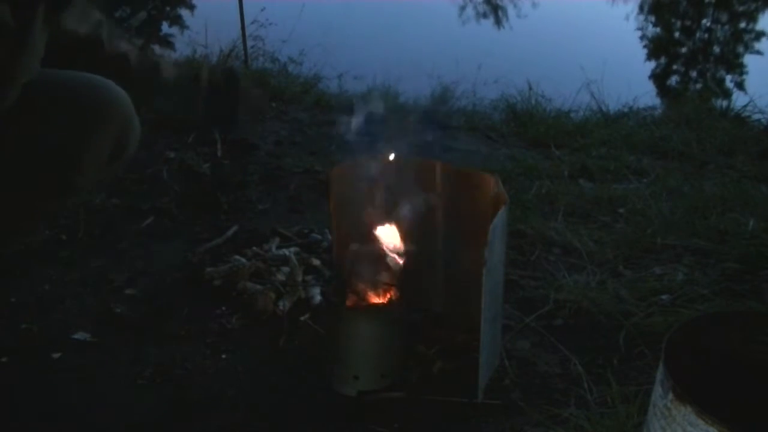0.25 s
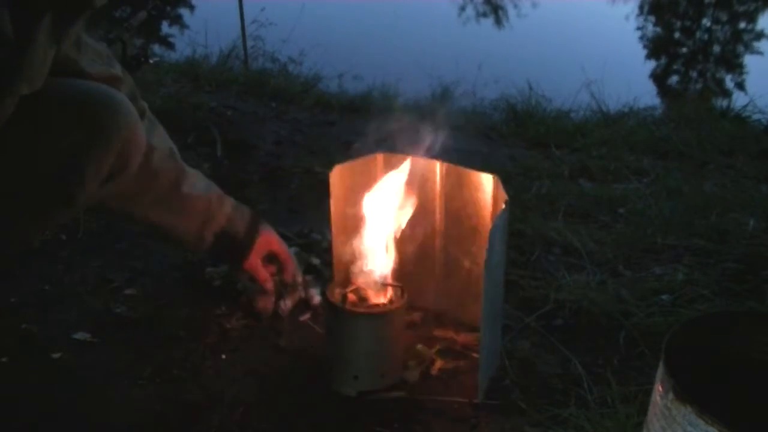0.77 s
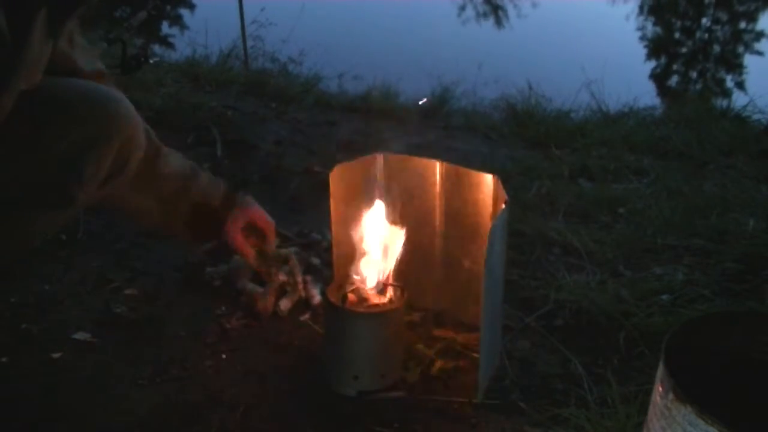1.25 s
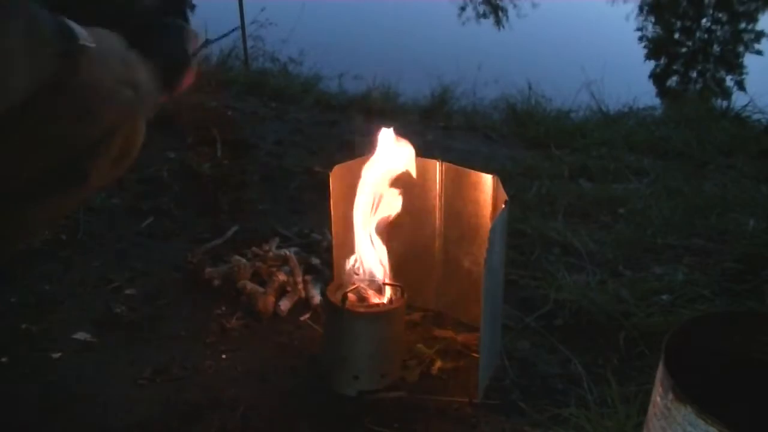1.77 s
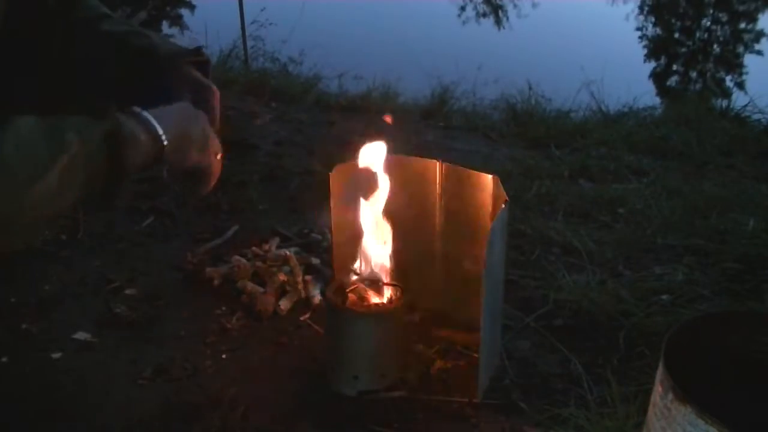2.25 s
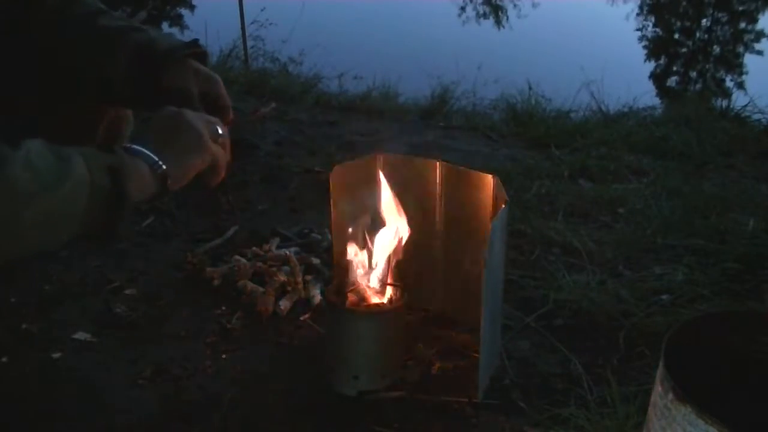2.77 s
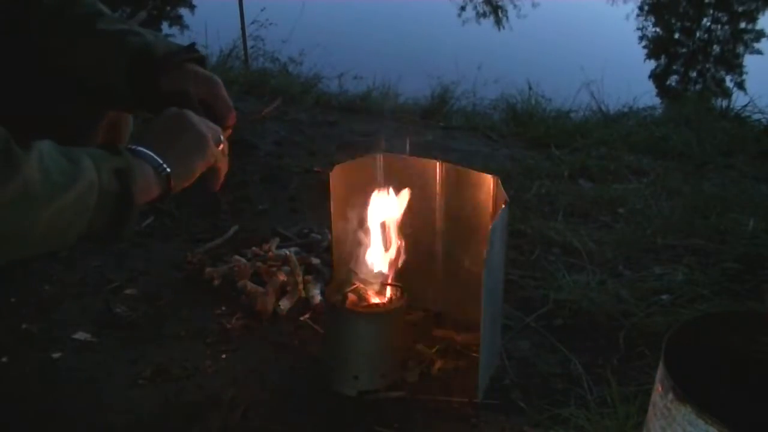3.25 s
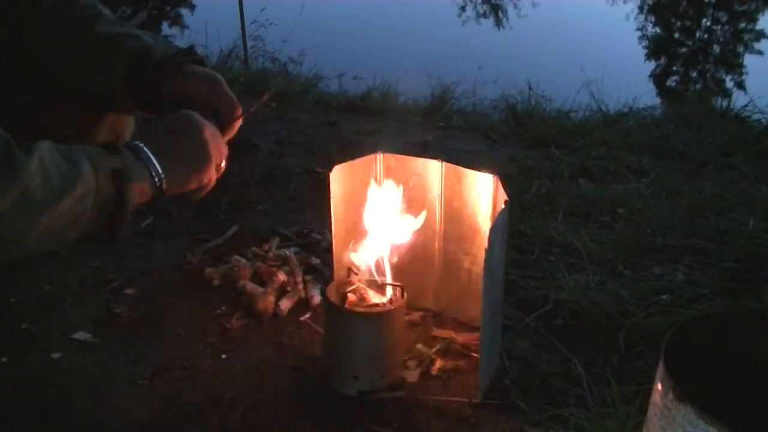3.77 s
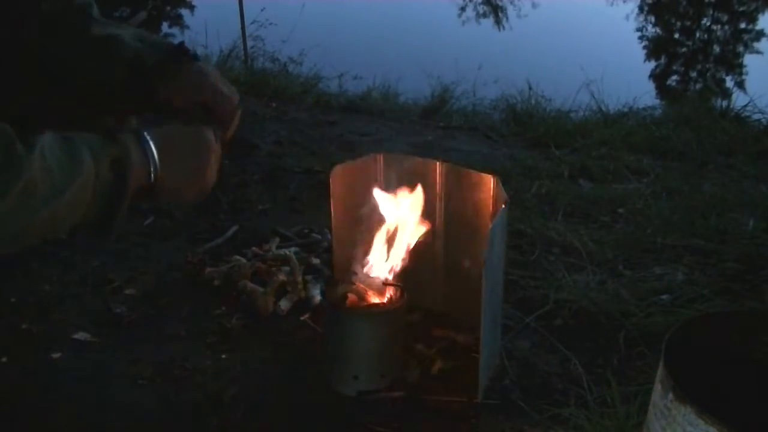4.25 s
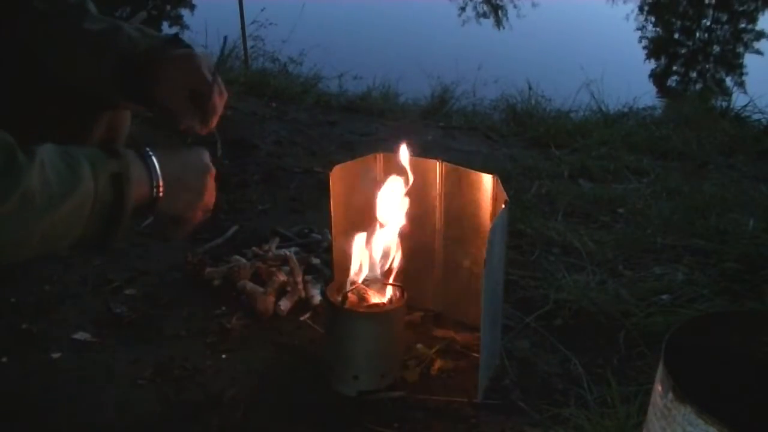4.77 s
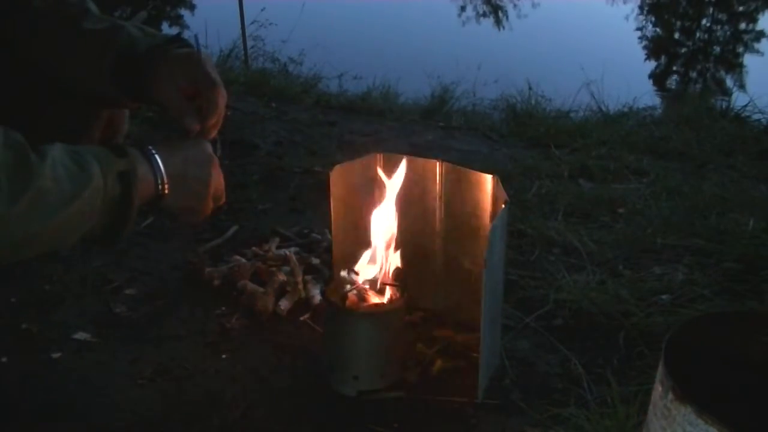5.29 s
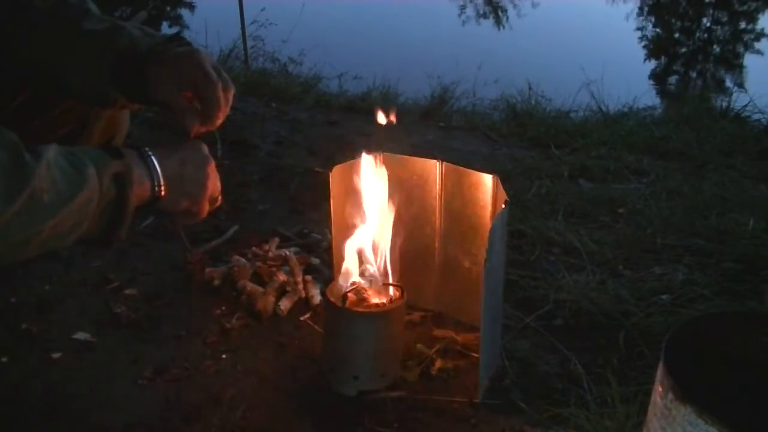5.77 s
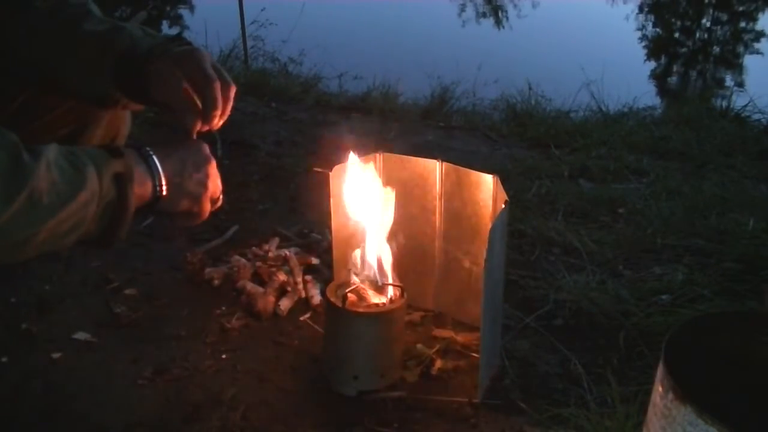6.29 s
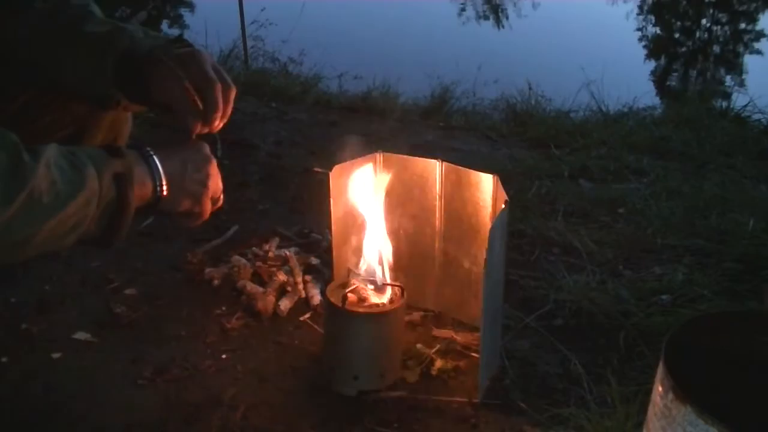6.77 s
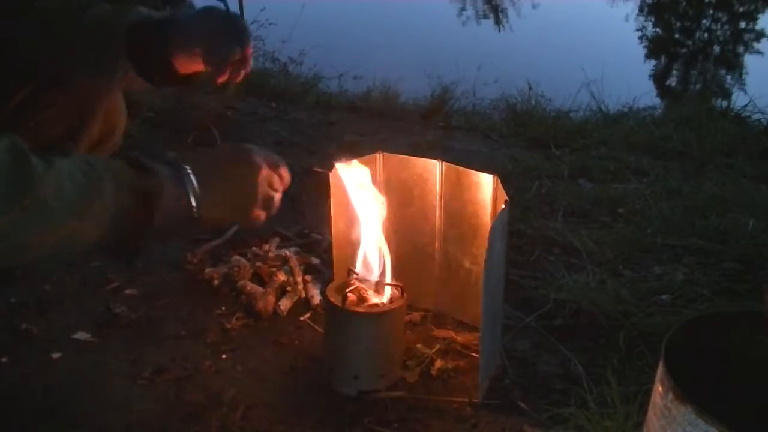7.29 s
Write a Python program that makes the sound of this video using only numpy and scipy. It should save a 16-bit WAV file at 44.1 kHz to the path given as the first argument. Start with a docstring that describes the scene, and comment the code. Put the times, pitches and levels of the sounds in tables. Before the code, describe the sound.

A small wood fire pops and flutters outdoors over high, rasping crickets, with one short swish of cloth.

```python
"""Outdoors at dusk: twigs burn in a small camp stove inside a sheet-metal windscreen.
Wood fractures in pops and ticks that ring the metal, over fluttering flames and a faint steam whistle.
Wood sizzle blends with soft cloth rustle; low bumps are flaps of flame and shuffling among sticks.
A jacket sleeve swishes, cloth on cloth, as someone shifts; a dry stick is knocked twice.
Two bush crickets rasp in the grass, file teeth clicking against the wing."""
import sys
import numpy as np
from scipy import signal
from scipy.fft import rfft, irfft, next_fast_len
from scipy.io import wavfile

SR = 44100
rng = np.random.default_rng(int(sys.argv[2]) if len(sys.argv) > 2 else 0)


def file_out(sig):
    """Save sig as 16-bit WAV at sys.argv[1]."""
    # one column per channel
    cols = np.atleast_2d(sig).T
    # limit, then scale
    lim = np.clip(cols, -1, 1)
    pcm = np.round(lim * 32767).astype(np.int16)
    wavfile.write(sys.argv[1], SR, pcm)


N = 332073
TIME = np.arange(N) / SR


def crackle(ticks_per_s=11.0, tick_db=-64.0, spread_db=2.5):
    """Loud wood pops, plus faint ember ticks at random times."""
    # t/s, relative level/dB, bass/dB and treble/dB re middle, tear time/s, note f/Hz, relative ring/dB
    pops = [(0.0306, -49, -7, -2, 0.0027, 5100, -11), (0.2505, -46.5, -7, -30, 0.0032, 3350, -8),
            (0.455, -37, -7.5, -1.5, 0.000093, 2780, 5), (0.5624, -35, -9.5, -10, 0.00044, 2770, 3),
            (0.9479, -51.5, -9, -7, .0003, 4000, 0), (1, -40, -9, -2.5, 0.0003, 3900, -1),
            (1.0759, -38, -18, 4.5, 0.00023, 6500, 5), (1.2786, -46, 7.5, -9, .0011, 860, 2),
            (2.657, -48, -1, -1, 0.00039, 3990, -3), (2.7005, -39.5, -9, 2, 0.00037, 4050, 7),
            (2.751, -51.5, -4, -14, .0014, 840, 6), (2.9736, -48, -10.5, -20, 0.0013, 4040, 9),
            (3.0287, -50, -5, -8, .001, 1490, 4), (3.4964, -41.5, 6, 9, .0015, 810, 5),
            (3.5028, -36.5, -21, 7, .0028, 10850, -12), (3.51, -38.5, -16, 3, .002, 4050, -14),
            (3.5171, -35, -15, 4.5, 0.0027, 2280, -9), (3.706, -42, -8.5, -5.5, 0.00031, 2790, 5),
            (3.8466, -52.5, -5, -2, .00037, 4000, 4), (3.914, -45.5, -6, 7, 0.0022, 3464, -7),
            (4.0349, -48, -8, 7, 0.002, 6780, -10), (4.204, -49.5, -4, -9, .002, 870, 4),
            (4.222, -29, -8, 4.5, .0024, 2140, -32), (4.309, -56, -9, -10, .0003, 4050, -2),
            (5.0313, -55.5, 3, -2, .0025, 860, 4), (5.4127, -44.5, -7, -17, .00021, 2810, 2),
            (5.4927, -47, -2, -14, 0.00053, 890, 5), (5.5237, -50, -4, -3, .00033, 855, 6),
            (6.2324, -54.5, -6, -4, .00034, 870, 2), (6.4849, -45.5, -10, -10, 0.00043, 4020, 5),
            (6.5398, -55, -7, -6, .001, 2860, 2), (6.6764, -41.5, -15.5, -2, .0003, 6500, 0),
            (6.8281, -47, -14, -5, .00041, 4500, 3), (6.947, -55.5, -9, -4, .0027, 4080, -2),
            (7.244, -39, -9.5, 2.5, 0.00032, 4450, 1), (7.3006, -44, -11, 1.5, 0.00029, 4090, -2)]
    out, ring = np.zeros(N), stove_ring()
    for s, *shape in pops:
        add(out, s, pop(*shape, ring))
    for when, size, bright in rng.random((int(ticks_per_s * N / SR), 3)):
        db = tick_db + spread_db * min(-np.log(size), 3)
        tick = pop(db, bass_db=2 - 12 * bright, treble_db=-14 + 12 * bright, tear_s=0.0003,
                   note_hz=900 + 3200 * bright, ring_db=2.3, ring=ring)
        add(out, when * N / SR, tick)
    return gain_of(0.78) * scatter(out, t60_s=0.086, wet_db=-15.5, side_db=-8.5)


def pop(db, bass_db, treble_db, tear_s, note_hz, ring_db, ring, rattle_t60_s=0.02, note_t60_s=0.023):
    """A snap and a run of tiny fractures; each pop sounds a brief note, the stove rings and rattles."""
    t, hz = np.arange(2048) / SR, np.fft.rfftfreq(2048, 1 / SR)
    fibres, walls = rng.standard_normal((2, len(t)))
    crack = fibres * np.exp(-(t / (2 * tear_s)) ** 2) + walls * gain_of(-16 - 60 * t / rattle_t60_s)
    crack[0] += 2.0  # snap
    note = np.sin(2 * np.pi * note_hz * t) * gain_of(-60 * t / note_t60_s)
    crack = crack / np.linalg.norm(crack) + gain_of(ring_db - 5) * ring
    crack += gain_of(-13.5) * note / np.linalg.norm(note)
    # thin fibres snap bright, thick ones dull: balance three registers
    power = abs(rfft(crack)) ** 2
    bands_hz = [(600, 1800), (2400, 7500), (8000, 15500)]
    bass, middle, treble = (10 * np.log10(power[(hz > lo) & (hz < hi)].sum()) for lo, hi in bands_hz)
    low_db, high_db = bass_db - bass + middle, treble_db - treble + middle
    tone = [(120, low_db - 32), (400, low_db - 21.5), (700, low_db), (1700, low_db),
            (2250, 0.66 * low_db), (2750, 0), (6800, 0.2 * high_db), (8800, high_db + 1.5),
            (12500, high_db + 1.5), (16000, high_db - 11.5)]
    return at_level(colour(crack, at_hz(tone, hz)), db)


def stove_ring():
    """Ring of can and windscreen, energy 1."""
    modes = [(536, 2.5, 0.034), (881, 5, 0.02), (1483, -4.5, 0.047), (2024, -1.5, 0.019),
             (2830, -8.5, 0.035), (4140, -1.5, 0.015), (4990, -8, 0.021), (5610, -9, 0.027),
             (6780, -6, 0.015), (7200, -12, .03), (11260, -11, .03)]  # f/Hz, relative level/dB, t60/s
    ring = damped_sines(modes, np.arange(2048) / SR)
    return ring / np.linalg.norm(ring)


def flames_and_rustle(flutter_db=2.5, tatter_db=2.5, fizz_db=1.17, bump_s=0.013, bumps_per_s=3.5):
    """Flame flutter, soft low bumps, and a hiss of wood sizzle and soft cloth rustle."""
    levels = [(0, -63, -52.5), (0.15, -63.5, -56.5), (0.33, -63.5, -55.5), (0.6, -66, -58),
              (0.85, -65, -58), (1.07, -69.5, -61.5), (1.42, -66.5, -57.5), (2.5, -67.5, -55),
              (2.85, -66.5, -60.5), (3.7, -67.5, -62), (4.22, -64, -59), (4.55, -68, -61.5),
              (5.2, -71, -63), (5.65, -70, -60.5), (6.2, -72.5, -63), (7.1, -70.5, -62.5), (7.4, -74, -58),
              (7.52, -58.5, -56)]  # t/s, relative flame level/dB, relative level of sizzle and rustle/dB
    bumps = [(0.026, -52), (0.396, -59.5), (0.659, -51.5), (0.705, -54), (0.775, -54.5), (0.816, -54.5),
             (1.008, -59.5), (2.652, -60), (3.033, -58.5), (3.075, -59), (3.313, -58), (4.228, -59),
             (4.357, -61), (4.445, -59.5), (6.418, -59), (7.025, -60.5)]  # flaps of flame and shuffling among sticks: t/s, relative level/dB
    flame_spectrum = [(20, -36), (55, -26), (90, -12), (130, -9.5), (220, -1.5), (330, 0), (470, 6.5),
                      (600, -3.5), (900, -14.5), (1500, -3.5), (2200, -22), (4000, -45)]  # f/Hz, relative level/dB
    hiss_spectrum = [(300, -22), (650, -0.5), (900, 2), (1200, 1), (1550, 2), (2400, 0), (3300, -2),
                     (4500, -4), (7000, -8), (12000, -10), (16000, -21)]  # f/Hz, relative level/dB
    flame_db, hiss_db = follow(levels)
    small_bumps = [(when * N / SR, flame_db[int(when * N)] + 1.5 + 3 * size)
                   for when, size in rng.random((int(bumps_per_s * N / SR), 2))]
    bump_power = sum(gain_of(2 * db) * np.exp(-np.minimum(((TIME - s) / bump_s) ** 2, 50))
                     for s, db in bumps + small_bumps)
    roar = gain_of(flame_db - 2.5 + flutter_db * wander(39))
    low = noise(flame_spectrum, apart=0.46)
    low *= np.sqrt(roar ** 2 + bump_power * gain_of(2 * tatter_db * wander(110)))
    low = signal.sosfilt(butter(85, "high"), low)  # small fire, no deep bass
    hiss = noise(hiss_spectrum, apart=0.97) * gain_of(hiss_db + 1 + fizz_db * wander(47))
    return low + hiss


def sleeve(catch_db=1.0, zip_db=-5.5):
    """Cloth slides on cloth, catching slightly; the ribbed weave zips at a pitch set by sliding speed."""
    slide = [(1.42, -55, 0, 0, 1295), (1.53, -51, 2, -2, 1300), (1.57, -40.5, -7, 4, 1411),
             (1.71, -34.5, -7.5, 0, 2190), (1.78, -41.5, 1, 1.5, 2950), (1.95, -42, 7, 1.5, 1996),
             (2.13, -42.5, 1.5, -2, 3100), (2.28, -43, 7, .7, 3200), (2.32, -55, 0, 0, 2800),
             (2.36, -54, 0, -1, 2800)]  # t/s, relative level/dB, bass/dB, treble/dB, zip f/Hz
    cloth_spectrum = [(100, -55), (220, -28), (450, -13), (750, -9), (1050, -5.5), (1650, -3.5),
                      (2000, -1.5), (3000, -1), (3700, -3), (4200, -5), (4900, -5), (6200, -10.5),
                      (7200, -12), (8200, -16), (11000, -19.5), (16000, -32)]  # f/Hz, relative level/dB
    db, bass_db, treble_db, zip_hz = follow(slide)
    rub = noise(cloth_spectrum, apart=0.024)
    low = signal.sosfiltfilt(butter(1100, "low"), rub)
    high = signal.sosfiltfilt(butter(4000, "high"), rub)
    rub += low * (gain_of(bass_db) - 1) + high * (gain_of(treble_db) - 1)
    weave = fuzzy_tone(zip_hz, spread_hz=360) + gain_of(-25) * fuzzy_tone(2 * zip_hz, spread_hz=340)
    contact = np.interp(TIME, [1.42, 1.5, 2.31, 2.36], [0, 1, 1, 0])
    return (rub + gain_of(zip_db) * weave) * contact * gain_of(db - 1 + catch_db * wander(71))


def stick_knocks(scuff_t60_s=0.048, attack_s=0.0015):
    """A knocked dry stick rings over a dull scuff of bark."""
    knocks = [(2.549, -45, 1), (7.5, -41, -16)]  # t/s, level/dB over 10 ms, relative scuff/dB
    modes = [(604, -20, 0.016), (1160, -12.5, 0.028), (1326, -8, 0.026), (1486, -4.5, 0.026),
             (2180, -11, .02), (2910, -6, 0.021), (3226, 1, 0.029)]  # f/Hz, relative level/dB, t60/s
    out, t = np.zeros(N), np.arange(3000) / SR
    ring = damped_sines(modes, t)
    for s, db, scuff_db in knocks:
        scuff = unit_rms(signal.sosfilt(butter([1000, 3400], "band"), rng.standard_normal(len(t))))
        scuff *= gain_of(scuff_db - 60 * t / scuff_t60_s)
        knock = (ring + scuff) * (1 - np.exp(-t / attack_s))
        add(out, s, at_level(knock, db))
    return scatter(out, t60_s=0.072, wet_db=-18, side_db=-10)


def crickets():
    """A near cricket and a shriller one, each about six chirps a second."""
    # bouts: first chirp t/s, last chirp t/s, relative level/dB, quickening share
    near_bouts = [(0.0, 3.373, -54.5, .025), (4.012, 7.4, -54.5, -.011)]
    shrill_bouts = [(0.036, 0.373, -63, 0), (0.594, 5.998, -62.3, .013), (6.638, 7.434, -63.5, -.005)]
    # wing spectra: f/Hz, relative level/dB
    near_wing = [(6500, -48), (8300, -16.5), (8950, -8.5), (9400, 0), (9700, -1), (10500, 0), (11100, -6),
                 (11700, -17.5), (13000, -41), (16000, -24.5)]
    shrill_wing = [(7000, -40), (8600, -28), (9800, -2), (10800, 0.5), (11500, -0.5), (11950, 2.5),
                   (12250, -3.5), (12800, -10), (13500, -19), (16000, -25)]
    near = chirps(near_bouts, rise_s=0.014, t60_s=0.32, second_s=0.046, second_db=-0.5, uneven_db=0.4)
    shrill = chirps(shrill_bouts, rise_s=0.016, t60_s=0.24, second_s=0.053, second_db=2.5, uneven_db=1.2)
    near *= gain_of(0.65) * rasp(near_wing, tooth_hz=516, grain=0.76)
    shrill *= gain_of(3.5) * rasp(shrill_wing, tooth_hz=314, grain=1.5)
    return gain_of(-1.5) * scatter(near + shrill, t60_s=0.06, wet_db=-5.5, side_db=-9)


def chirps(bouts, rise_s, t60_s, second_s, second_db, uneven_db, period_s=0.169, jitter_s=0.0022):
    """Song envelope: two wing strokes a chirp, each fading in the grass."""
    power, lead_s = np.zeros(N), 0.03
    t = np.arange(SR // 5) / SR - lead_s
    stroke = np.where(t < 0, np.exp(-(t / rise_s) ** 2), gain_of(-60 * t / t60_s))
    for first_s, last_s, db, quickening in bouts:
        u = np.linspace(0, 1, round((last_s - first_s) / period_s) + 1)
        starts_s = first_s + (last_s - first_s) * (u + quickening * u * (1 - u)) - lead_s
        for s, (late, force1, force2) in zip(starts_s, rng.standard_normal((len(u), 3))):
            s += jitter_s * late
            add(power, s, (gain_of(db + uneven_db * force1) * stroke) ** 2)
            add(power, s + second_s, (gain_of(db + second_db + uneven_db * force2) * stroke) ** 2)
    return np.sqrt(power)


def rasp(wing, tooth_hz, grain):
    """File teeth click against the wing at an uneven rate; rms 1."""
    turns = np.cumsum(tooth_hz * (1 + 0.2 * wander(120))) / SR
    teeth = 1 + grain * np.exp(-(turns % 1) / 0.13)
    hz = np.fft.rfftfreq(2048, 1 / SR)
    return unit_rms(colour(teeth * rng.standard_normal(N), at_hz(wing, hz)))


def steam():
    """Faint steam whistle, rising then sinking."""
    whistle = [(3.95, 3000, -80), (4.25, 3540, -71), (4.45, 3900, -73), (4.62, 4000, -68), (4.8, 3650, -75),
               (5.1, 3110, -81)]  # t/s, f/Hz, level/dB
    hz, db = follow(whistle)
    return gain_of(db) * fuzzy_tone(hz, spread_hz=240)


def evening_air():
    """Steady, wide hush."""
    spectrum = [(20, -38), (80, -21.5), (200, -6.5), (450, 1), (900, 0.5), (2000, -8), (5000, -11),
                (16000, -25.5)]  # f/Hz, relative level/dB
    return gain_of(-62.5) * noise(spectrum, apart=5.8)


def scatter(x, t60_s, wet_db, side_db):
    """Direct sound plus short stereo reflections off ground, grass and metal."""
    t = np.arange(SR // 4) / SR
    mid, side = rng.standard_normal((2, len(t))) * gain_of(-60 * t / t60_s) * (t > 0.001)
    side *= gain_of(side_db)
    tails = np.array([mid + side, mid - side]) / np.linalg.norm(mid)
    return x + gain_of(wet_db) * signal.oaconvolve(x[None], tails, axes=1)[:, :N]


def noise(spectrum, apart):
    """Stereo noise, rms 1; apart scales how unlike the sides are."""
    likeness = [(25, .05), (60, 0.6), (125, 0.87), (250, 0.93), (500, 0.86), (1000, 0.85), (2500, 0.83),
                (8000, 1), (16000, 1)]  # f/Hz, left-right correlation at apart=1
    size = next_fast_len(N)
    hz = np.fft.rfftfreq(size, 1 / SR)
    mid, side = rfft(rng.standard_normal((2, size))) * gain_of(at_hz(spectrum, hz))
    share = np.clip(apart * (1 - at_hz(likeness, hz)) / 2, 0, 0.5)
    mid, side = mid * np.sqrt(1 - share), side * np.sqrt(share)
    return unit_rms(irfft([mid + side, mid - side], size)[:, :N])


def fuzzy_tone(hz, spread_hz):
    """Narrow noise band along the curve hz, rms 1."""
    phase = 2 * np.pi * np.cumsum(hz) / SR
    return unit_rms(wander(spread_hz) * np.cos(phase) + wander(spread_hz) * np.sin(phase))


def wander(hz):
    """Random drift up to about hz, rms 1."""
    f = np.fft.rfftfreq(N, 1 / SR)
    return unit_rms(irfft(rfft(rng.standard_normal(N)) / (1 + (f / hz) ** 4), N))


def damped_sines(modes, t):
    """Sum of decaying modes."""
    return sum(gain_of(db - 60 * t / t60_s) * np.sin(2 * np.pi * hz * t) for hz, db, t60_s in modes)


def colour(x, db):
    """Causal filter from dB values on an even grid up to SR/2."""
    log_gain = np.log(gain_of(np.r_[db, db[-2:0:-1]]))
    taps = np.fft.ifft(np.exp(np.conj(signal.hilbert(log_gain)))).real
    return signal.fftconvolve(x, taps[:len(db)])[:len(x)]


def butter(hz, kind):
    """Order-2 filter sections."""
    return signal.butter(2, hz, kind, fs=SR, output="sos")


def gain_of(db):
    """dB to amplitude."""
    return 10 ** (np.asarray(db) / 20)


def unit_rms(x):
    """Scale to rms 1."""
    return x / np.sqrt(np.mean(x ** 2) + 1e-20)


def at_level(x, db):
    """Scale to the energy of 10 ms at level db."""
    return gain_of(db) * x / np.sqrt(np.sum(x ** 2) / (SR / 100))


def at_hz(points, hz):
    """Interpolate on a log frequency axis."""
    f, value = np.transpose(points)
    return np.interp(np.log(hz + 1), np.log(f + 1), value)


def follow(rows):
    """Timed columns at every sample."""
    s, *columns = np.transpose(rows)
    return [np.interp(TIME, s, c) for c in columns]


def add(mix, s, sound):
    """Mix in at time s."""
    part = mix[max(0, round(s * SR)):][:len(sound)]
    part += sound[:len(part)]


def scene():
    """Stove straight ahead, crickets beyond."""
    return (crackle() + stick_knocks() + sleeve() + flames_and_rustle()
            + evening_air() + steam() + crickets())


def record(dry, edge_hz=15900):
    """Low-pass band limit."""
    return signal.oaconvolve(dry, signal.firwin(401, edge_hz, window=("kaiser", 9), fs=SR)[None], "same")


dry = scene()
out = record(dry)
file_out(out)
```